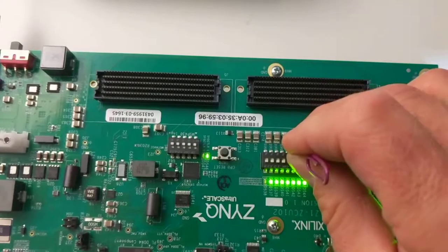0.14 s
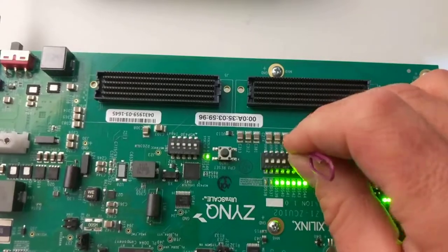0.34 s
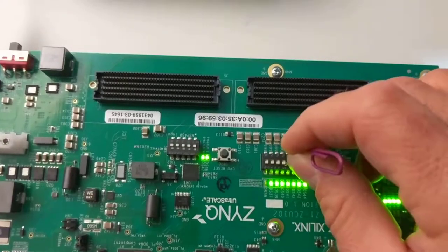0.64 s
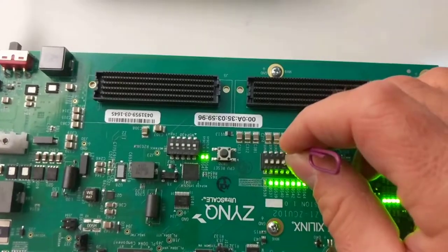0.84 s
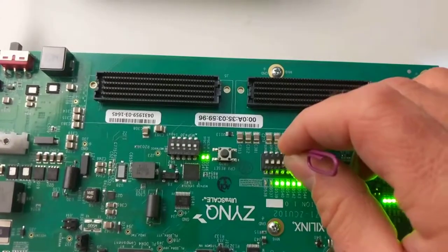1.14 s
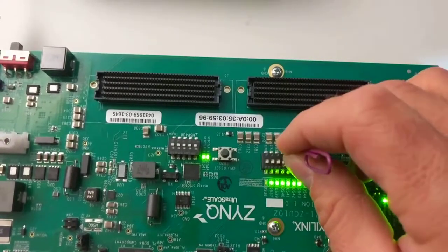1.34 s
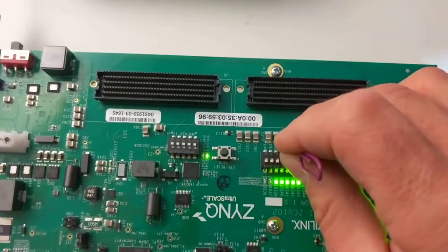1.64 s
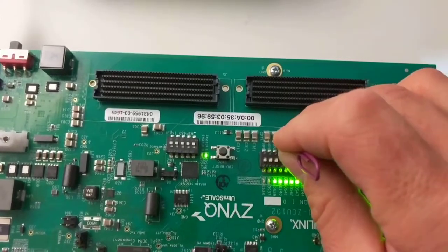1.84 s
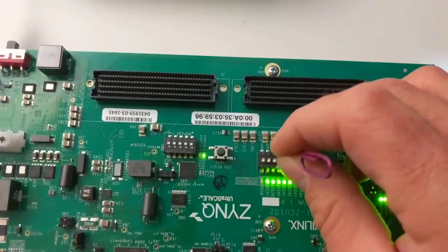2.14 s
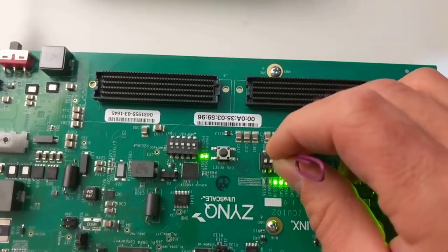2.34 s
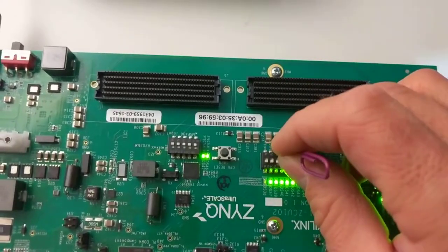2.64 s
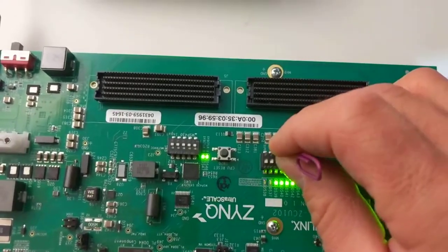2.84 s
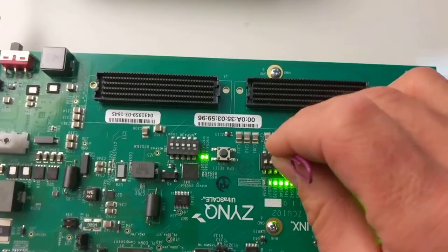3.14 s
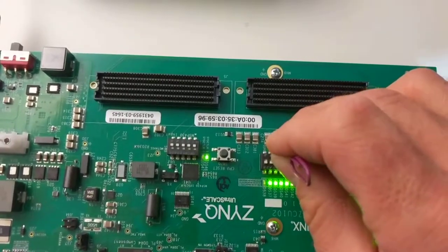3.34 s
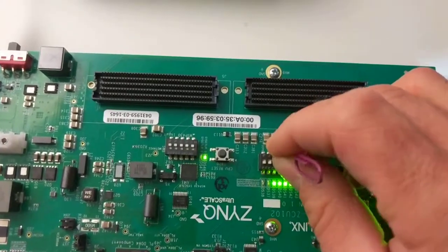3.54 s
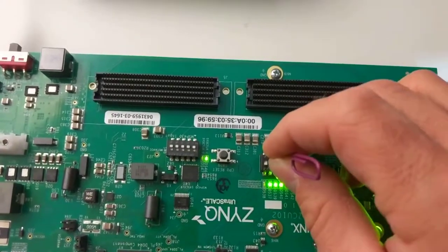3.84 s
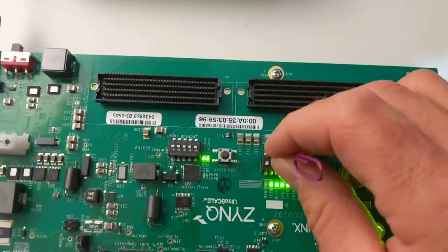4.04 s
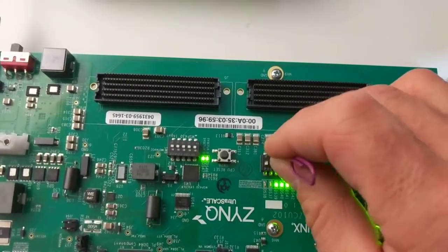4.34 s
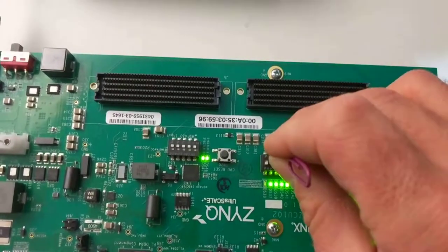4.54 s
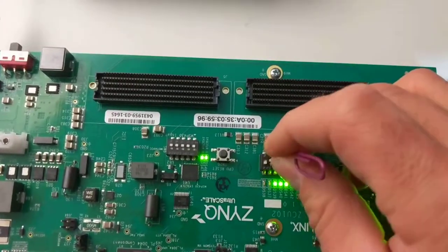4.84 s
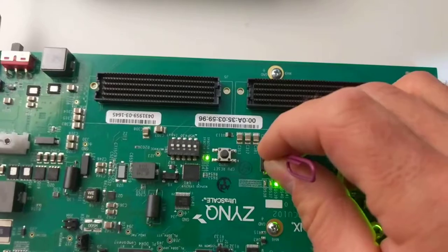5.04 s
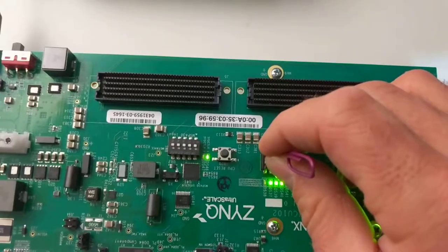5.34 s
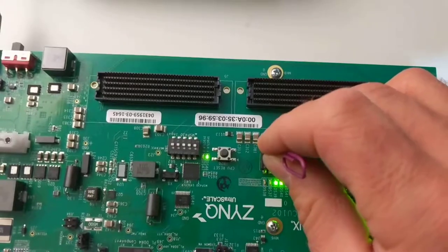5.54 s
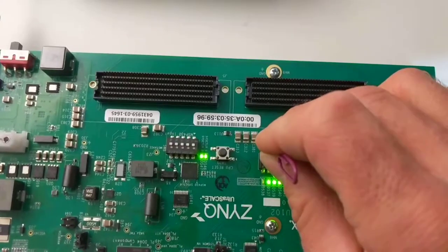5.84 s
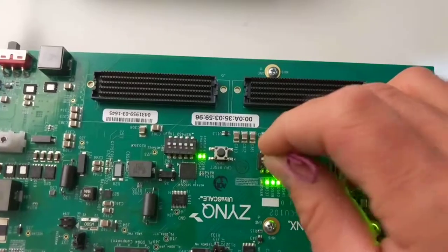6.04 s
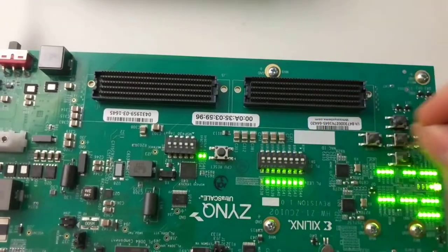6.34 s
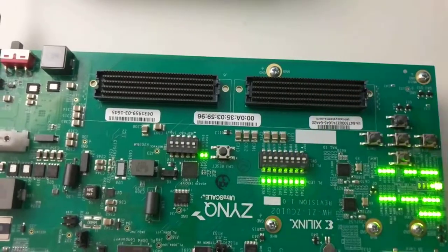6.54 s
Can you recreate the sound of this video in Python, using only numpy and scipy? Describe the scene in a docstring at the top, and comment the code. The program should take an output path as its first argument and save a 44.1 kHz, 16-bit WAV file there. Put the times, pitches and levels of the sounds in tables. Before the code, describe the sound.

Close up at a desk in a quiet room, a small fan hisses steadily with a faint thin whine. Five tiny switches on a circuit board are flipped one at a time, each a bright, hard snap with a short woody knock beneath. Between them the hand bumps the desk very softly. Finally the arm withdraws with a dull rub and light thumps, and the hiss changes colour slightly.

```python
"""On a desk lies a circuit board, where a thin tip flips five tiny slide switches.
Each snap is a short burst plus decaying tones of the switch housing, the board and, dully, the desk.
A small cooling fan hisses (coloured noise) and whines (sine tones) throughout.
Now and then the hand bumps softly on the desk (low decaying tones).
At the end the hand draws back: its arm rubs (dull noise) and its moving echo sweeps through the hiss.
"""
import sys
import numpy as np
from scipy import signal
from scipy.fft import rfft, irfft, next_fast_len
from scipy.io import wavfile

SR = 44100
rng = np.random.default_rng(int(sys.argv[2]) if len(sys.argv) > 2 else 0)


def file_out(sig):
    """Save sig as 16-bit WAV at sys.argv[1]."""
    # one column per channel
    cols = np.atleast_2d(sig).T
    # limit, then scale
    lim = np.clip(cols, -1, 1)
    pcm = np.round(lim * 32767).astype(np.int16)
    wavfile.write(sys.argv[1], SR, pcm)


N = 295029
TIME = np.arange(N) / SR  # seconds

# Switch snaps: t/s, housing level/dB, board level/dB, desk level/dB,
# housing tilt/(dB per octave), board tilt/(dB per octave); more tilt is brighter
SNAPS = [(0.2016, 0.5, -2.3, 2.5, -1, 0), (1.8281, 0.5, 0.2, 2.5, -2, 0.3), (3.329, -3.3, 3.5, 1, 0.5, 1),
         (4.5942, 0, -1.5, 2.5, 0, 1), (5.828, -0.9, -1, 3, -3.5, -1)]
# Ringing tones (modes) of each body: f/Hz, level/dB before tilt and scatter, time to fall 60 dB/s
HOUSING_MODES = [(5150, -28.5, .006), (6030, -35, .018), (6700, -28.5, .012), (7290, -33, .022),
                 (7660, -34.5, .026), (8000, -29.5, .022), (8330, -41, .03), (8780, -32, .019),
                 (9170, -33, .024), (9780, -21.3, .015), (10120, -38, .03), (10530, -21, .011),
                 (10880, -26.5, .0136), (11330, -31, .016), (11950, -25, .007), (12430, -30, .018),
                 (13100, -27, .013), (13850, -34, .014), (14850, -29, .013), (15500, -34, .012)]
BOARD_MODES = [(728, -30.5, .04), (812, -31.5, .042), (850, -44, .27), (904, -31.5, .048), (963, -52, .08),
               (1032, -26, .024), (1318, -39.5, .045), (1382, -22, .0155), (1520, -26.5, .006),
               (1850, -29.5, .0105), (2020, -26.5, .0135)]
DESK_MODES = [(58.6, -49, 0.12), (87, -58.5, 0.19), (143, -49.5, 0.099), (181, -52.5, 0.19),
              (270, -49, 0.1), (309.5, -58.5, 0.28), (392, -61, 0.27), (537, -39.5, 0.023)]
BOARD_BASS_HZ = 430  # the small board radiates little below this pitch
# Colour of the room tail after a snap: f/Hz, relative level/(dB per Hz)
TAIL_COLOUR = [(200, -35), (600, 8.5), (850, 6), (1400, 11), (3000, -6.5), (6000, -3.5), (10000, 1),
               (12000, -7), (16000, -12)]

# Soft bumps of the hand on the desk: t/s, level/dB
BUMPS = [(1.271, -5), (3.78, -8), (4.819, -12), (4.991, -4), (6.06, -6), (6.419, -6.5), (6.542, -9),
         (6.648, -10)]
# Bumps get weaker above these pitches: the moving arm lands harder, so it sounds brighter
RESTING_BUMP_HZ, SLIDING_BUMP_HZ = 109, 330
# Colour of the arm rubbing on the desk: f/Hz, relative level/(dB per Hz)
SLIDE_COLOUR = [(25, -22), (70, 9), (150, -3), (320, -2), (500, -11), (1500, -40), (16000, -80)]
# The rub sets in quickly, holds and eases off
SLIDE_START_S, SLIDE_ATTACK_S, SLIDE_HOLD_S = 6.38, 0.04, 0.2
SLIDE_DB, SLIDE_FADE_DB_PER_S = -65.5, 30

# Colour of the air rushing through the fan: f/Hz, relative level/(dB per Hz)
AIR_COLOUR = [(25, -20), (58, -8), (95, -11.5), (130, -11), (300, -17), (520, -10.5), (1100, -8),
              (1400, -2.5), (2100, -4), (3300, -7.5), (5050, -10.5), (5700, -19.5), (8800, -20.5),
              (9400, -22.5), (13000, -21.5), (16000, -31)]
AIR_DB = -49.5  # rms level before flutter and the hand's colouring
# Resonances of the fan's heat sink and the board under it: f/Hz, width/Hz, boost/dB
AIR_PEAKS = [(835, 8.1, 10.5), (1368, 110, 4.5), (1923, 194, 6.5), (2430, 250, 2.5), (3030, 160, 3),
             (3840, 75, 5), (4280, 200, 4.5), (4740, 70, 5), (5200, 47, 3.5), (6330, 430, 6.5),
             (7510, 590, 6.5), (8300, 170, 2.5), (8770, 220, 4.5), (12700, 730, -1)]
FAN_HZ = 192.6  # average pitch of the hum
# Fan tones: multiple of the hum, rms level/dB before wavering and the hand's colouring
FAN_TONES = [(1, -74), (2.5, -80.5), (5, -66.5), (12, -68), (16, -69.5), (20, -71)]

# Reach of the hand: t/s, relative position
# (larger is further in over the switch row, negative is drawn back)
REACH = [(0, 0), (.33, 1.5), (.5, 0), (1.0, .03), (1.6, 0.5), (2.6, 0.2), (3.2, 1.4), (6.08, 1.5),
         (6.15, 0), (6.23, -0.3), (6.33, -3.1), (6.69, -2.5)]
# The hand's reflection cancels one pitch of the hiss, higher as the hand reaches in
NOTCH_HZ, NOTCH_OCTAVES_PER_REACH, NOTCH_DB = 5140, 0.2, 2.6
# This cut is deepest as the hand lifts clear, and gone when it is far (positions in units of reach)
CLEAR_REACH, CLEAR_SPAN, CLEAR_NOTCH_DB = -1.1, 0.68, 9
# The gap under the hand resonates, lower as the hand reaches in and stronger once the gap is open
GAP_HZ, GAP_OCTAVES_PER_REACH, GAP_DB, OPEN_GAP_DB = 5530, -0.085, 2.5, 4.5
OPENING_REACH = 0.25  # the gap starts to open below this reach


def switches():
    """Each snap rings the housing and the board at once; the desk answers a moment later."""
    out = np.zeros(N)
    for snap_s, housing_db, board_db, desk_db, housing_tilt_db, board_tilt_db in SNAPS:
        click = strike(HOUSING_MODES, scatter_db=2.0, tilt_db=housing_tilt_db)
        click = click + crack(level_db=-26.0, low_hz=1790, high_hz=5500, t60=0.016)
        housing = near_echoes(click, level_db=-13, first_s=0.002, last_s=0.014, t60=0.03)
        add(out, snap_s, from_db(housing_db) * housing)
        add(out, snap_s, from_db(board_db) * board_knock(board_tilt_db))
        desk_delay_s = 0.00329
        add(out, snap_s + desk_delay_s, from_db(desk_db) * desk_thud(bloom_s=0.0057))
        tail = room_tail(early_db=-34.5, early_t60=0.03, late_db=-47, late_t60=0.25, build_s=0.00058)
        add(out, snap_s, from_db((housing_db + board_db) / 2) * tail)
    return out


def strike(modes, scatter_db, tilt_db=0, size=16000):
    """One blow makes a body ring at its own pitches; neighbouring modes start in opposite directions."""
    out = np.zeros(size)
    centre_hz = np.mean([mode[0] for mode in modes])
    for k, (hz, db, t60) in enumerate(modes):
        scatter = scatter_db * rng.standard_normal()
        tilt = tilt_db * np.log2(hz / centre_hz)
        gain = from_db(db + scatter + tilt)
        direction = (-1) ** k
        out += direction * gain * dying(t60) * np.sin(2 * np.pi * hz * TIME[:size])
    return out


def crack(level_db, low_hz, high_hz, t60, size=16000):
    """The slider hits its stop: a very short burst of noise, kept to a broad band of pitches."""
    burst = from_db(level_db) * rng.standard_normal(size) * dying(t60)
    band = signal.butter(2, [low_hz, high_hz], "band", fs=SR, output="sos")
    return signal.sosfilt(band, burst)


def near_echoes(click, level_db, first_s, last_s, t60, count=24):
    """Fingers, connectors and desk throw the click back within a few milliseconds."""
    out = click.copy()
    delays_s = rng.uniform(first_s, last_s, count)
    signs = rng.choice([-1, 1], count)
    for delay_s, sign in zip(delays_s, signs):
        lag = max(1, int(delay_s * SR))
        gain = from_db(level_db - 60 * delay_s / t60)  # later echoes are weaker
        out[lag:] += sign * gain * click[:-lag]
    return out


def board_knock(tilt_db):
    """The board's modes ring, thin in the bass."""
    ring = strike(BOARD_MODES, scatter_db=0.5, tilt_db=tilt_db)
    return signal.sosfilt(signal.butter(2, BOARD_BASS_HZ, "high", fs=SR, output="sos"), ring)


def desk_thud(bloom_s, size=16000):
    """The board's feet set the desk swinging over a few milliseconds."""
    bloom = 1 - np.exp(-TIME[:size] / bloom_s)
    return strike(DESK_MODES, scatter_db=1) * bloom


def room_tail(early_db, early_t60, late_db, late_t60, build_s, size=16000):
    """Quick scatter from the hand and desk, then the faint decay of the room."""
    early = from_db(early_db) * dying(early_t60)
    late = from_db(late_db) * dying(late_t60)
    build_up = 1 - np.exp(-TIME[:size] / build_s)
    return coloured_noise(TAIL_COLOUR, size) * (early + late) * build_up


def hand_on_desk():
    """Soft flesh excites mostly the low modes of the desk; the arm rubs as it draws back."""
    age = TIME - SLIDE_START_S
    fade_db = SLIDE_FADE_DB_PER_S * np.maximum(age - SLIDE_ATTACK_S - SLIDE_HOLD_S, 0)
    attack = np.clip(age / SLIDE_ATTACK_S, 0, 1)
    out = attack * from_db(SLIDE_DB - fade_db) * coloured_noise(SLIDE_COLOUR, N)
    for bump_s, db in BUMPS:
        soft_hz = SLIDING_BUMP_HZ if bump_s > SLIDE_START_S else RESTING_BUMP_HZ
        softener = signal.butter(2, soft_hz, fs=SR, output="sos")
        bump = signal.sosfilt(softener, strike(DESK_MODES, scatter_db=1.5))
        add(out, bump_s, from_db(db) * bump)
    return out


def fan_air(flutter_db):
    """Turbulent air gives a nearly steady hiss, coloured by the heat sink and the board."""
    air = coloured_noise(AIR_COLOUR, next_fast_len(N))[:N]
    resonant = np.zeros(N)
    for hz, width_hz, boost_db in AIR_PEAKS:
        b, a = signal.iirpeak(hz, hz / width_hz, fs=SR)
        resonant += (from_db(boost_db) - 1) * signal.lfilter(b, a, air)
    return from_db(AIR_DB + flutter_db * drift(14)) * rms_one(air + resonant)


def fan_whine(wobble, waver_db):
    """Blade and motor tones follow one slightly unsteady speed; the high ones waver most in level."""
    speed_hz = FAN_HZ * (1 + wobble * drift(5))
    turn = 2 * np.pi * np.cumsum(speed_hz) / SR
    top_multiple = FAN_TONES[-1][0]
    out = np.zeros(N)
    for multiple, db in FAN_TONES:
        waver = waver_db * np.sqrt(multiple / top_multiple) * drift(14)
        out += np.sqrt(2) * from_db(db + waver) * np.sin(multiple * turn)  # sqrt(2): rms to peak
    return out


def past_the_hand(x, peak_width_hz, notch_width_hz):
    """The gap between hand and board boosts one pitch and cancels another; both follow the reach."""
    hz, t, frames = signal.stft(x, SR, nperseg=512)
    reach = np.interp(t, *np.transpose(REACH))

    peak_hz = GAP_HZ * 2 ** (GAP_OCTAVES_PER_REACH * np.maximum(reach, 0))
    closed = np.clip(reach / OPENING_REACH, 0, 1)
    boost_db = OPEN_GAP_DB + (GAP_DB - OPEN_GAP_DB) * closed

    notch_hz = NOTCH_HZ * 2 ** (NOTCH_OCTAVES_PER_REACH * reach)
    near = np.clip(1 + (reach - CLEAR_REACH) / CLEAR_SPAN, 0, 1)
    cut_db = NOTCH_DB * near + CLEAR_NOTCH_DB * bell(reach, CLEAR_REACH, CLEAR_SPAN)

    peak = boost_db * bell(hz[:, None], peak_hz, peak_width_hz)
    notch = cut_db * bell(hz[:, None], notch_hz, notch_width_hz)
    return signal.istft(frames * from_db(peak - notch), SR)[1][:N]


def from_db(db):
    """Turn decibels into a gain."""
    return 10 ** (np.asarray(db) / 20)


def rms_one(x):
    """Scale a sound to an rms of 1."""
    return x / np.sqrt(np.mean(x ** 2) + 1e-20)


def add(track, start_s, sound):
    """Mix a sound into the track at a given time."""
    at = int(round(start_s * SR))
    track[at:at + len(sound)] += sound[:N - at]


def coloured_noise(spectrum, size):
    """Noise of rms 1 whose level follows a smooth curve over pitch."""
    hz, db = np.transpose(spectrum)
    log_hz = np.log(np.fft.rfftfreq(size, 1 / SR) + 1)  # +1 avoids log of zero
    gain = from_db(np.interp(log_hz, np.log(hz), db))
    white = rfft(rng.standard_normal(size))
    return rms_one(irfft(white * gain, size))


def drift(rate):
    """Slow random wander: straight lines between `rate` random points a second, of spread 1."""
    knots = rng.standard_normal(400)
    return np.interp(TIME * rate, np.arange(len(knots)), knots)


def dying(t60, size=16000):
    """A fading curve that falls 60 dB in t60 seconds."""
    return np.exp(-np.log(1000) * TIME[:size] / t60)


def bell(x, centre, width):
    """A smooth hump of height 1."""
    return np.exp(-((x - centre) / width) ** 2)


def scene():
    """Switches, hand and fan reach one microphone, alike in both channels."""
    fan = fan_air(flutter_db=0.14) + fan_whine(wobble=0.00058, waver_db=1.5)
    fan = past_the_hand(fan, peak_width_hz=350, notch_width_hz=370)
    return np.tile(switches() + hand_on_desk() + fan, (2, 1))


def record(dry):
    """The microphone loses the deepest bass; the top is cut steeply."""
    bass_hz, top_hz = 38, 16000
    thin = signal.sosfilt(signal.butter(2, bass_hz, "high", fs=SR, output="sos"), dry)
    steep_cut = signal.ellip(8, 0.1, 80, top_hz, fs=SR, output="sos")  # 0.1 dB ripple, 80 dB cut
    return signal.sosfilt(steep_cut, thin)


dry = scene()
out = record(dry)
file_out(out)
```